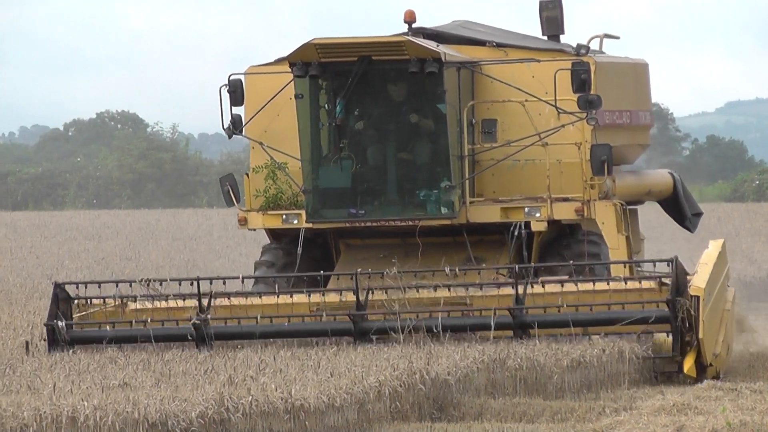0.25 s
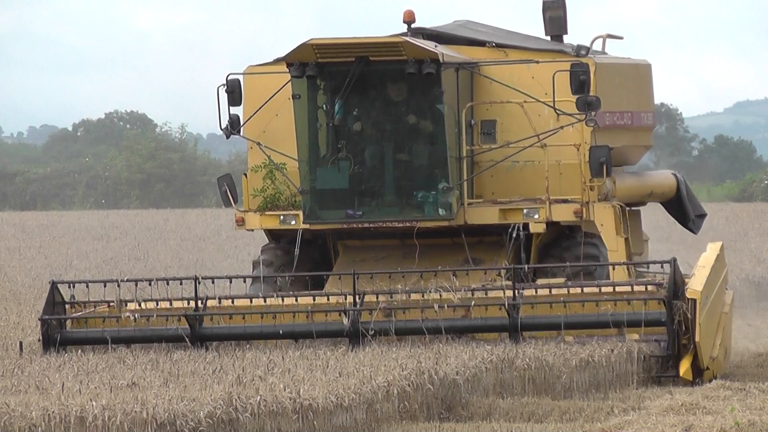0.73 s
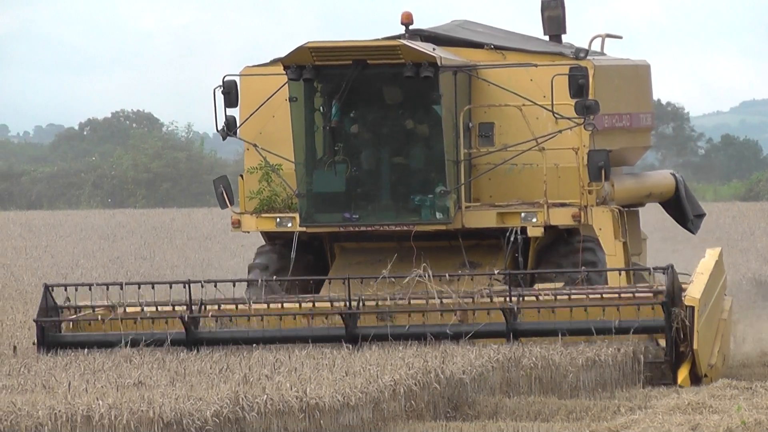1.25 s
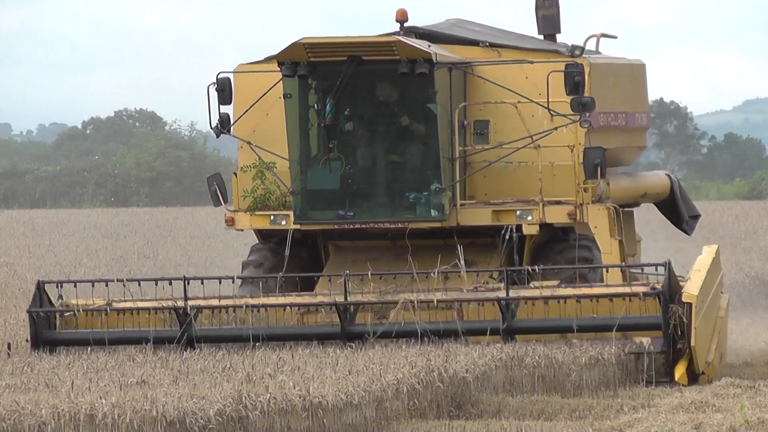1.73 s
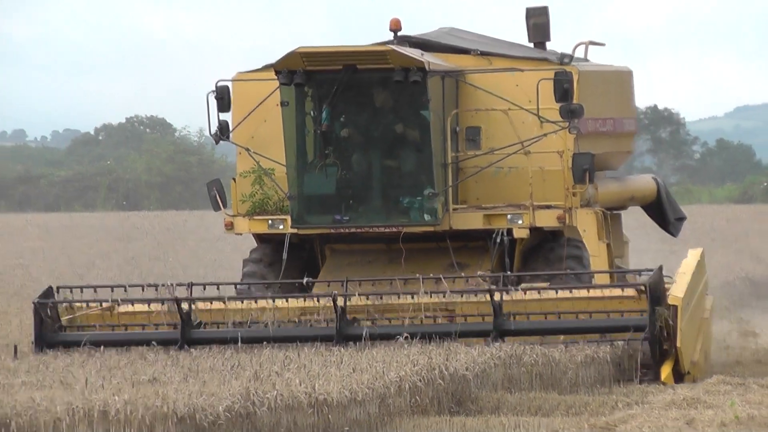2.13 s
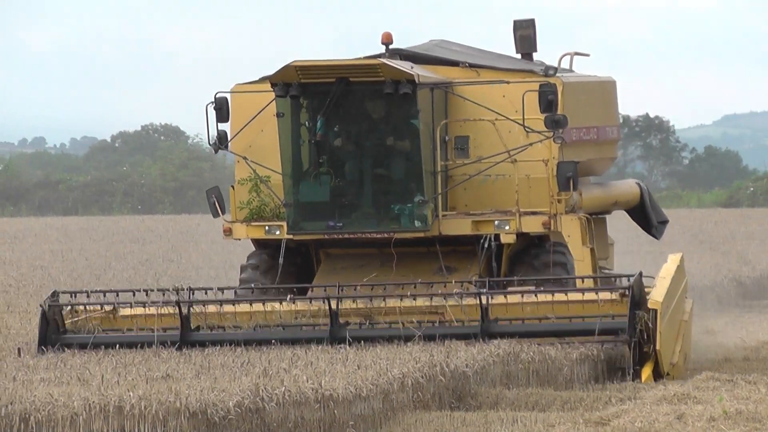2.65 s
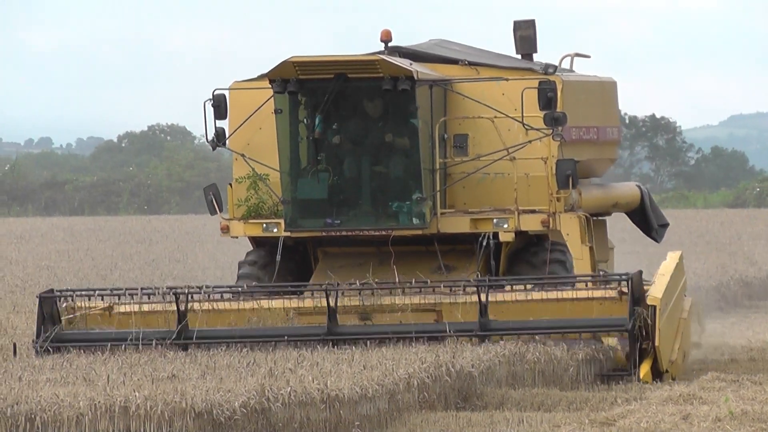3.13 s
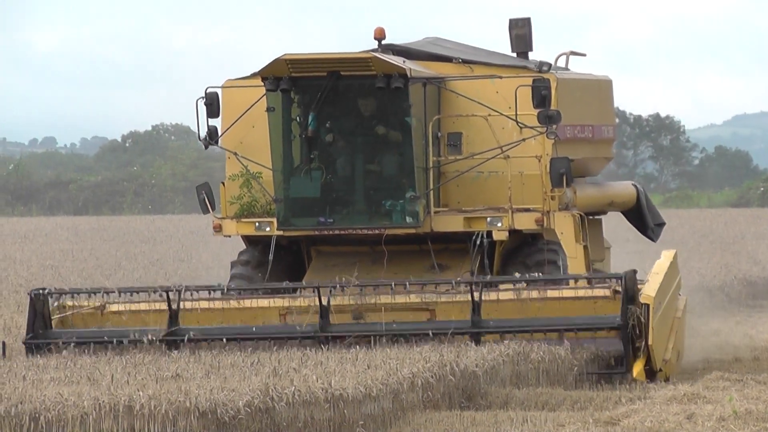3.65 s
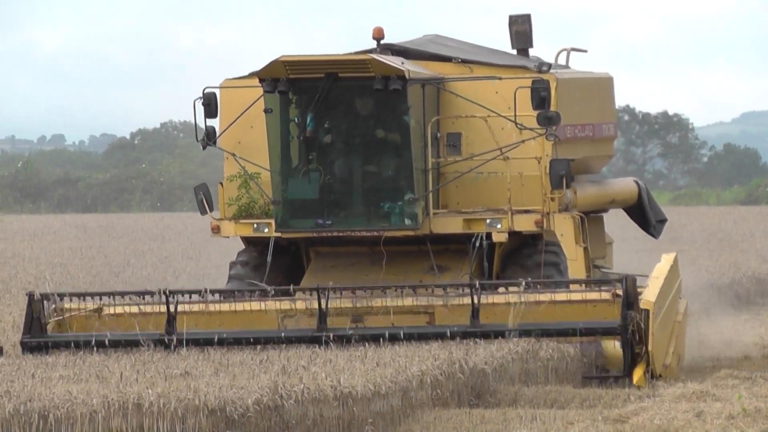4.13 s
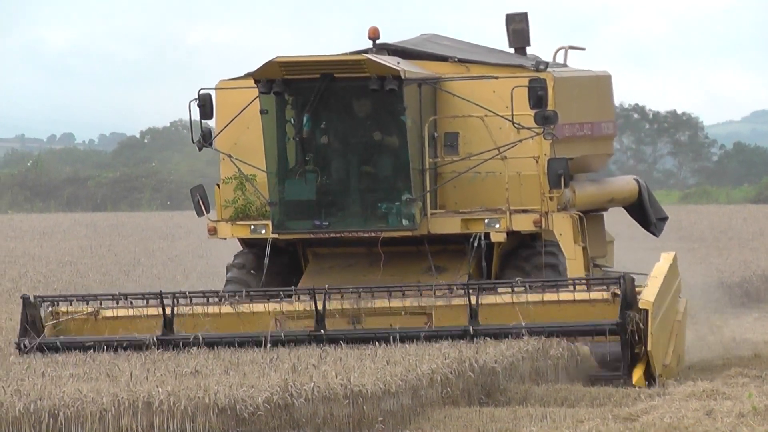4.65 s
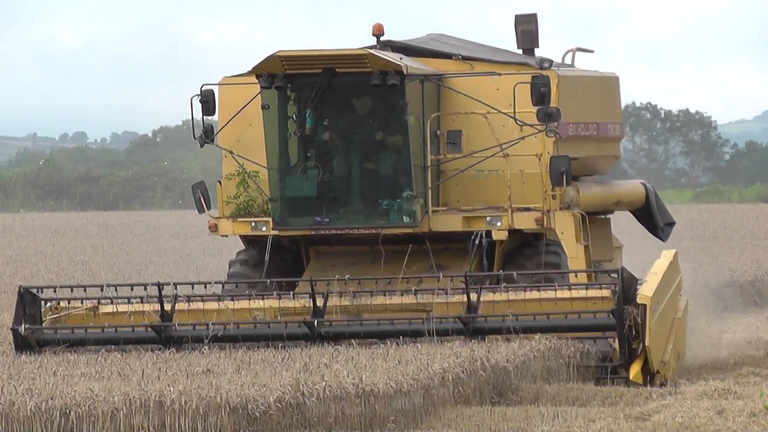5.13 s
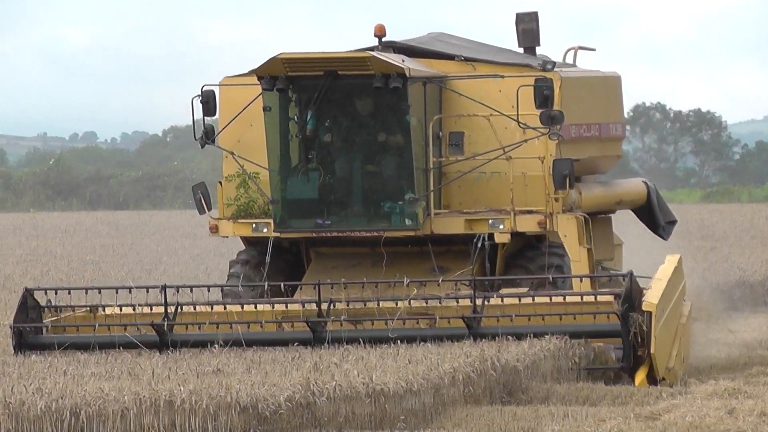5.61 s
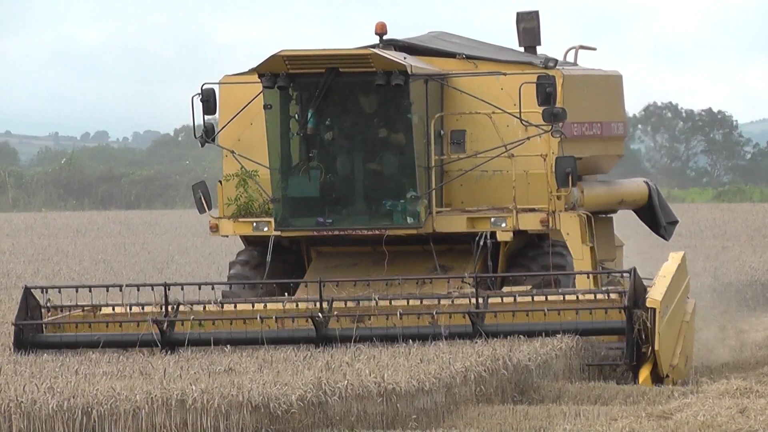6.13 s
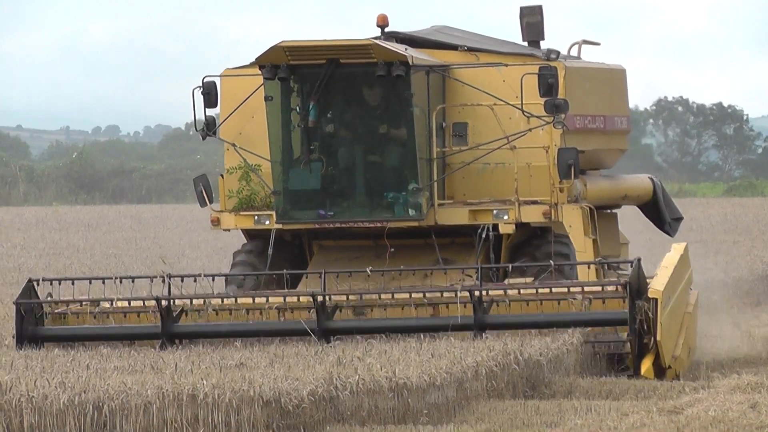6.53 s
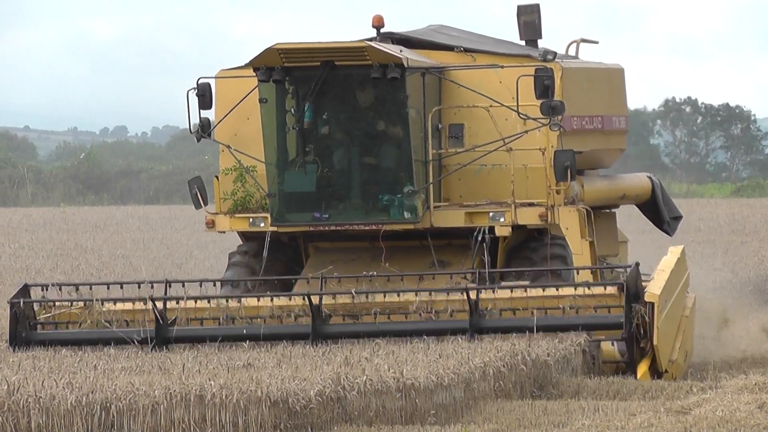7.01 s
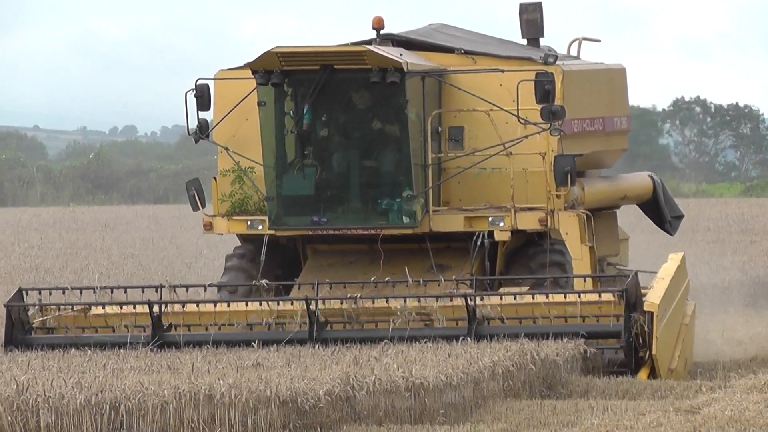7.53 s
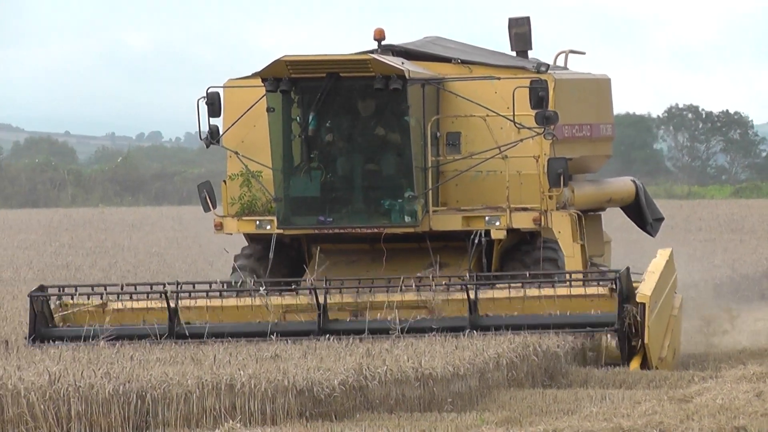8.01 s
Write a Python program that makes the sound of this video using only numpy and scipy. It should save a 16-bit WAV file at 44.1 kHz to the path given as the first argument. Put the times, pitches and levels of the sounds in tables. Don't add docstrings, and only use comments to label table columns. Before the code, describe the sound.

The machine is already running and never stops. Its low, slightly throbbing engine tone barely changes pitch, while a thin gear whine swells and recedes, strongest near the middle. Crop hiss and sheet-metal rattle pulse over it, with scattered sharp knocks and a few short metal rings. Outdoor stereo pickup, little reverberation, soft low wind gusts.

```python
import sys
import numpy as np
from scipy import signal
from scipy.fft import rfft, irfft, next_fast_len
from scipy.io import wavfile

SR = 44100
rng = np.random.default_rng(int(sys.argv[2]) if len(sys.argv) > 2 else 0)


def materialize(psi):
    bounded = np.clip(np.atleast_2d(psi).T, -1, 1)
    quanta = np.round(bounded * 32767).astype(np.int16)
    wavfile.write(sys.argv[1], SR, quanta)


def boost(x):
    u = np.asarray(x, float) / 20
    return 10 ** u


N = 364707
T = np.arange(N) / SR

# frequency in Hz, level in dB per Hz.
WIND_COLOUR = [(15, -14), (25, -21), (60, -20), (110, 0), (160, -9), (240, -17), (320, -20.5), (700, -31.5),
               (1200, -63)]
# middle in seconds, peak in dB, length in seconds.
GUSTS = [(.3, -46, .25), (.67, -52, .1), (1.07, -42, .2), (1.2, -53, 1.79), (1.68, -41, .1),
         (2.05, -47, .4), (3.13, -48, .2), (3.45, -57, .12), (4.05, -41, 0.22), (4.4, -53, .5),
         (4.69, -41, .13), (5.0, -50, .4), (6.97, -41, 0.18), (7.28, -38.5, 0.21), (7.55, -46, .3),
         (7.82, -36, .1), (8.07, -37.5, 0.18), (8.22, -46, 0.11)]
# start in seconds, pitch in Hz, width in Hz, level in dB, rise in seconds.
CLANKS = [
    (3.118, 1890, 90, -28, .012),
    (3.21, 3420, 200, -27, .065),
    (3.275, 3100, 400, -33, .02),
    (4.37, 2850, 250, -29, .006),
    (5.2, 1900, 90, -32, .012),
    (1.91, 2650, 120, -34, .01),
    (6.26, 3450, 150, -31, .011),
    (.735, 4700, 150, -39, .006),
    (2.25, 3300, 300, -33, .01),
]
# start in seconds, level in dB over the steady noise, brightest pitch in Hz.
KNOCKS = [(.178, 10.5, 6000), (.5595, 10.5, 6500), (.606, 6, 8500), (.669, 9.5, 10500), (.7716, 5, 8500),
          (.8684, 10, 7000), (1.1154, 9, 5000), (1.2254, 11, 10000), (1.583, 9, 8000), (1.915, 6.5, 4000),
          (2.2528, 2, 2500), (2.5356, 5.5, 2500), (2.9758, 7.5, 4000), (3.0335, 7.5, 6500),
          (3.831, 12, 12500), (4.0233, 10, 8500), (4.3738, 5, 5000), (4.7095, 11, 13000),
          (4.7412, 10, 4500), (5.4005, 6, 6000), (6.106, 8.5, 3500), (6.1412, 7, 10000), (6.3824, 8, 12000),
          (6.572, 6, 7000), (6.773, 4, 12000), (7.0669, 8, 10000), (7.1252, 10, 7500), (7.8511, 5, 5500),
          (8.1191, 5, 7000), (8.2474, 8, 9000)]
# frequency in Hz, T60 in seconds.
KNOCK_T60 = [(2500, .18), (6000, .07), (12000, .045)]
# pitch in Hz, width in Hz, level in dB (not heard here: all ring alike).
PANELS = [(762, 49, 0), (1767, 130, -4), (3220, 420, -6), (4700, 220, -13), (5650, 690, -17),
          (6100, 130, -18), (8230, 810, -19)]
# time in seconds, level in dB.
CROP_FLOW = [(0.0, -47.5), (1.08, -46), (1.36, -44), (2.05, -46.5), (3.25, -47.5), (3.43, -48.5),
             (4.91, -44.5), (5.16, -46), (5.64, -44.5), (6.4, -46.5), (7.05, -44.5), (7.32, -45.5),
             (8.02, -46), (8.27, -44)]
# frequency in Hz, level in dB per Hz.
RUMBLE = [(20, -84), (40, -73), (50, -63.5), (70, -58), (95, -55.5), (140, -48), (175, -50), (205, -46),
          (260, -47), (290, -52.5), (340, -57.5), (400, -65.5)]
# frequency in Hz, level in dB per Hz.
LEFT_COLOUR = [(620, -64), (800, -64.5), (1000, -67), (1750, -69), (2600, -70), (3800, -69), (4300, -76.5),
               (4750, -74), (6200, -82), (7700, -75), (9400, -83.5), (10500, -96), (12500, -99.1),
               (14700, -114.2)]
RIGHT_COLOUR = [(620, -65), (800, -64.5), (1000, -69), (1800, -63), (2800, -68.5), (3600, -68.5),
                (3950, -66), (4300, -71.5), (4750, -72.5), (5650, -74.5), (8100, -81.5), (9800, -81),
                (12400, -90.5), (14300, -101.4)]
# frequency in Hz, level in dB per Hz.
TOP_END = [(15200, -124)]
# centre in Hz, width in Hz, depth in dB.
LEFT_DIPS = [(506, 124, -14), (1232, 170, -10.2), (2026, 95, -22), (4090, 160, -9.5), (4480, 200, -4),
             (5400, 720, -13), (6530, 300, -3), (9340, 300, -10)]
RIGHT_DIPS = [(486, 76, -15), (1472, 303, -7.5), (2330, 650, -9), (4164, 245, -13.5), (4450, 244, -18),
              (5210, 410, -5), (6030, 200, -3), (7200, 510, -14), (7370, 250, -20), (13050, 350, 2),
              (13700, 400, 1)]
# frequency in Hz, direct share of the power from 0 to 1.
DIRECT_SHARE = [(35, .6), (90, .998), (300, .999), (420, .985), (800, .965), (1700, .97), (3000, .97),
                (3900, .94), (4700, .88), (6200, .75), (8200, .8), (10500, .62), (12500, .75), (14300, .25)]
# frequency in Hz, lead of the left port in radians.
LEFT_LEAD = [(0, 0), (1810, -0.2), (2070, 0.6), (2500, -0.3), (4310, -0.8), (4570, -5.7), (5080, -8.4),
             (6290, -19.1), (6550, -22.7), (6800, -23.3), (8180, -19.7), (9650, -20.7), (10700, -19.2),
             (15200, -19.1)]
# middle in seconds, peak in dB, length in seconds.
WHINE_SWELLS = [
    (.4, -48, .3),
    (2.35, -45.5, 0.78),
    (3.55, -41.5, .6),
    (4.2, -49, .3),
    (5.6, -45.5, .7),
    (6.8, -44.5, .9),
]
# multiple of its pitch, level in dB relative to it.
WHINE_LINES = [(1, 0), (.972, -8), (2, -9)]
# time in seconds, firing rate in Hz.
SPEED = [(0.0, 125.13), (0.43, 121.98), (1.37, 123.14), (1.88, 120.86), (2.14, 123.21), (2.41, 122.34),
         (2.93, 124.04), (3.2, 121.83), (3.48, 123.02), (3.84, 122.18), (4.37, 123.72), (5.0, 120.95),
         (5.34, 123.69), (6.01, 122.39), (6.73, 124.83), (7.35, 120.07), (7.72, 124.03), (8.27, 122.88)]
# time in seconds, firing tone in dB, octave in dB.
EFFORT = [(0.0, -19, -22), (0.31, -17.5, -19.4), (1.0, -18.3, -22.5), (1.73, -17, -18.5),
          (1.89, -19.7, -21.5), (2.37, -16.6, -20.5), (2.74, -18.3, -22), (3.05, -17, -20.5),
          (3.92, -17.7, -22.5), (4.59, -18, -20.5), (4.74, -16.5, -19.5), (5.11, -19, -21.2),
          (5.81, -16.5, -21), (6.53, -19, -23), (7.2, -15.5, -18.5), (7.45, -19.5, -23),
          (8.08, -16.5, -19.5), (8.27, -18, -24)]
# time in seconds, level in dB.
ROTOR_LOAD = [(0, -32), (1.1, -33), (1.75, -38), (2.1, -37), (3.0, -26.5), (4.2, -28), (5.6, -26.5),
              (6.9, -29.5), (8.27, -24)]
# multiple of the firing rate, level in dB.
ORDERS = [(0.4023, -59), (0.4668, -54), (0.5889, -52), (0.6816, -48), (0.8223, -48), (1.0625, -35),
          (1.4111, -32), (1.5898, -42), (1.6455, -41), (2.0566, -40), (2.2344, -33), (2.4111, -43),
          (2.4678, -47), (2.6455, -49), (3.0, -40), (3.2344, -60)]
# multiple of the firing rate, level in dB.
MORE_ORDERS = [(1.34, -42), (5.156, -54), (7.977, -59), (22.27, -55)]


def in_time(rows):
    s, *columns = np.transpose(rows)
    return [np.interp(T, s, column) for column in columns]


def at_hz(points, hz):
    point_hz, value = np.array(points)[:, 0], np.array(points)[:, 1]
    return np.interp(np.log(hz + 1), np.log(point_hz + 1), value)


def drift(rate_hz):
    r = np.exp(-80 * np.pi * rate_hz / SR)
    slow = signal.lfilter([1], [1, -2 * r, r * r], rng.standard_normal(N // 40 + 2002))
    slow = slow[2000:]
    return np.interp(np.arange(N) / 40, np.arange(len(slow)), slow / slow.std())


def shaped(x, response):
    size = next_fast_len(N + 4096)
    hz = np.arange(size // 2 + 1) * SR / size
    return irfft(rfft(x, size) * response(hz), size)[..., :N]


def resonance(x, hz, width):
    r = np.exp(-np.pi * width / SR)
    zeros = np.array([1, 0, -1]) * (1 - r * r) / 2
    return signal.lfilter(zeros, [1, -2 * r * np.cos(2 * np.pi * hz / SR), r * r], x)


def swells(rows, rest_db):
    power = boost(2 * rest_db)
    for middle, peak_db, length in rows:
        power = power + boost(2 * peak_db) * np.exp(-(2 * (T - middle) / length) ** 2)
    return np.sqrt(power)


def wind():
    noise = shaped(rng.standard_normal((2, N)), lambda hz: boost(at_hz(WIND_COLOUR, hz)))
    lumps = np.array([drift(22), drift(22)])
    return swells(GUSTS, rest_db=-57) * boost(6.0 + 2.6 * lumps) * noise / noise.std()


def clanks():
    t60_s, pure_below_hz = 0.1, 160
    out = np.zeros(N)
    after = T[:SR // 4]
    for s, hz, width, level_db, rise in CLANKS:
        tone = np.sqrt(2) * np.sin(2 * np.pi * hz * after)
        rough = resonance(rng.standard_normal(SR // 2), hz, width)[SR // 4:]
        pure = 1 / (1 + (width / pure_below_hz) ** 2)
        ring = np.sqrt(pure) * tone + np.sqrt(1 - pure) * rough / rough.std()
        fall = boost(-60 * np.maximum(after - rise, 0) / (t60_s + rise))
        start = int(s * SR)
        out[start:start + len(after)] += boost(level_db - 4.5) * np.minimum(after / rise, 1) * fall * ring
    return out


def knocks(band_hz):
    rise_s, octave_loss_db = .0008, 4.5
    s, db, brightest_hz = np.transpose(KNOCKS)
    strikes = np.full(N, 1e-18)
    octaves_off = np.log2(band_hz / brightest_hz)
    strikes[(s * SR).astype(int)] = boost(2 * (db - octave_loss_db * octaves_off ** 2))
    fall = boost(-120 / (at_hz(KNOCK_T60, band_hz) * SR))
    rise = np.exp(-1 / (rise_s * SR))
    return signal.lfilter([1 - rise], np.convolve([1, -fall], [1, -rise]), strikes)


def grain_rattle(per_s):
    sizes = boost(4.95 * np.minimum(rng.exponential(1, N), 2.7)) * rng.choice([-1, 1], N)
    hits = sizes * (rng.random(N) < per_s / SR) * np.sqrt(SR / per_s)
    panel = rng.integers(0, len(PANELS), N)
    out = np.zeros(N)
    for k, (hz, width, _) in enumerate(PANELS):
        out += resonance(hits * (panel == k) + 1e-18, hz, np.clip(0.51 * width, 40, 300))
    return out


def machinery():
    walker_hz, walker_top_s = 2.86, .175
    knife_hz, knife_top_s = 18.65, .027
    flow_db, = in_time(CROP_FLOW)
    swing_db = flow_db - flow_db.mean()
    hiss_db = -1.56 + swing_db
    rattle_db = 0.27 + 0.35 * swing_db
    walker = np.exp(2.0 * (np.cos(2 * np.pi * walker_hz * (T - walker_top_s)) - 1))
    knife = np.cos(2 * np.pi * knife_hz * (T - knife_top_s))

    zones_hz = [500, 2500, 6000, 12000]
    zones_db = [0 * T, rattle_db + 1.2 * walker, hiss_db + 2.06 * walker + 0.89 * knife,
                hiss_db + .4 * walker + 1.0 * knife]
    shudder = 0.62 * drift(27)
    power = [boost(2 * (db + (k > 0) * shudder)) for k, db in enumerate(zones_db)]

    white = rng.standard_normal((2, 3, N))
    edges = 17000 * 2 ** np.arange(-9.5, .1, .5)
    out = 0
    for k, (low, high) in enumerate(zip(edges, edges[1:])):
        middle = np.sqrt(low * high)
        place = np.interp(np.log(middle), np.log(zones_hz), np.arange(4))
        below = min(int(place), 2)
        steady = power[below] * (1 + below - place) + power[below + 1] * (place - below)
        struck = knocks(middle) if low > 800 else 0
        gain = np.sqrt(steady + 0.81 * struck) * boost(0.45 * drift(6.8))
        band = signal.butter(2, [low, high], "band", fs=SR, output="sos")
        out = out + gain * signal.sosfilt(band, white[k % 2])
    out[0] += boost(-3.5) * np.sqrt(power[1] + .6 * knocks(3000)) * grain_rattle(per_s=900)
    return out


def port(noise, scattered, colour, dips, side):
    def level(hz):
        return boost(at_hz(RUMBLE + colour + TOP_END, hz)) * np.sqrt(SR / 2)

    def share(hz):
        return np.clip(at_hz(DIRECT_SHARE, hz), 0, 1)

    def direct(hz):
        notch_db = sum(db * np.exp(-.5 * (2.13 * (hz - centre) / width) ** 2) for centre, width, db in dips)
        phase = np.exp(.5j * side * at_hz(LEFT_LEAD, hz))
        return level(hz) * boost(notch_db) * np.sqrt(share(hz)) * phase

    def diffuse(hz):
        return level(hz) * boost(-1.5) * np.sqrt(1 - share(hz))

    return shaped(noise, direct) + shaped(scattered, diffuse)


def gear_whine(firing_hz):
    mean_hz = firing_hz.mean()
    shaft_hz = mean_hz + .45 * (firing_hz - mean_hz)
    turn = 2 * np.pi * 6.365 * np.cumsum(shaft_hz) / SR
    lines = sum(boost(db) * np.cos(multiple * turn) for multiple, db in WHINE_LINES)
    return swells(WHINE_SWELLS, rest_db=-54) * lines


def engine():
    (firing_hz,), (tone_db, octave_db), (hum_db,) = in_time(SPEED), in_time(EFFORT), in_time(ROTOR_LOAD)
    turn = 2 * np.pi * np.cumsum(firing_hz) / SR
    throb_hz, throb_top_s, throb_depth_db = 5.14, .035, .8
    throb_db = throb_depth_db * np.cos(2 * np.pi * throb_hz * (T - throb_top_s))
    firing = boost(tone_db + 0.5 * drift(5.9)) * np.cos(turn)
    octave = boost(octave_db + 0.9 * drift(6.0)) * np.cos(2 * turn)
    rotor_hum = boost(hum_db + 0.86 * drift(3.4)) * np.cos(1.8225 * turn)
    out = boost(throb_db) * (firing - octave) + rotor_hum + gear_whine(firing_hz)
    for multiple, level_db in ORDERS + MORE_ORDERS:
        wander_db = 0.43 + 1.1 * drift(7.8)
        out += boost(level_db + wander_db) * np.cos(multiple * turn + rng.uniform(0, 2 * np.pi))
    return np.sqrt(2) * out


def scene():
    direct, left, right = machinery()
    tones = engine() + clanks()
    tones = np.array([boost(0.1) * np.roll(tones, 1), boost(0.47) * tones])
    noise = [port(direct, left, LEFT_COLOUR, LEFT_DIPS, side=0.99),
             port(direct, right, RIGHT_COLOUR, RIGHT_DIPS, side=-1.0)]
    return tones + wind() + noise


def roll_off(x):
    return signal.sosfilt(signal.butter(12, 15720, fs=SR, output="sos"), x)


def record(dry):
    return roll_off(dry)


dry = scene()
out = record(dry)
materialize(out)
```